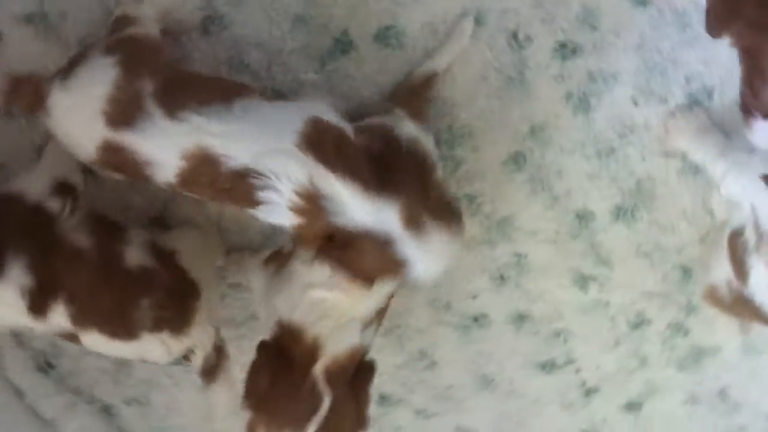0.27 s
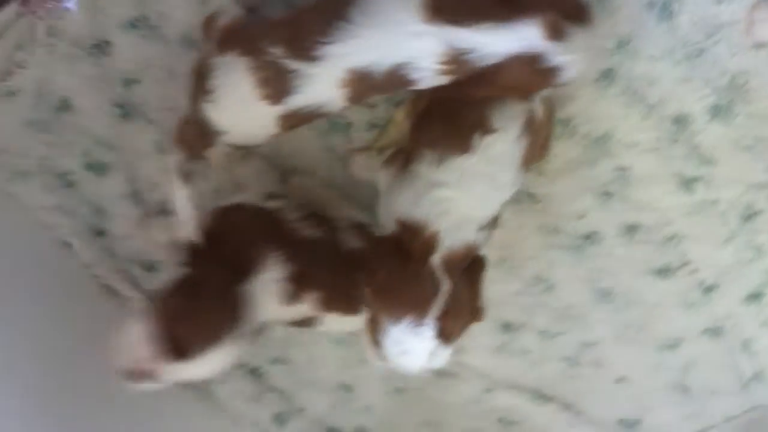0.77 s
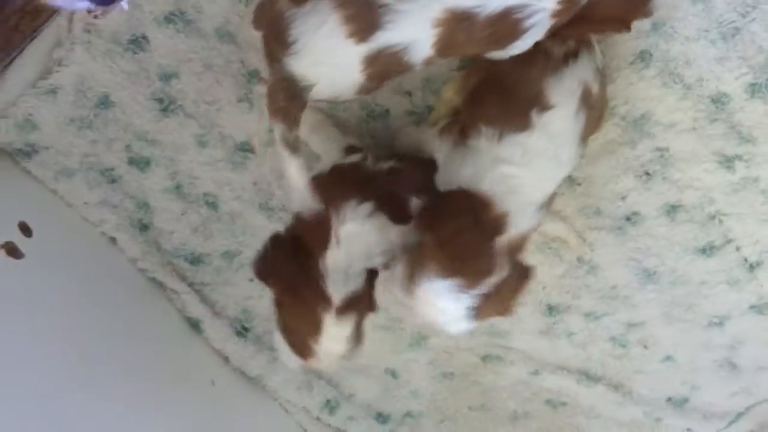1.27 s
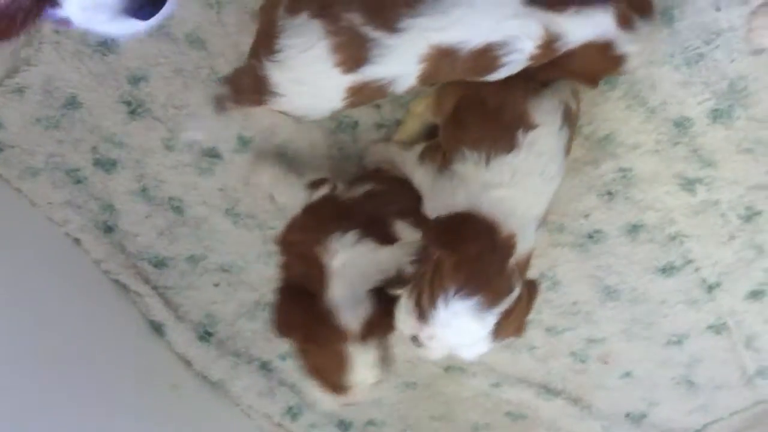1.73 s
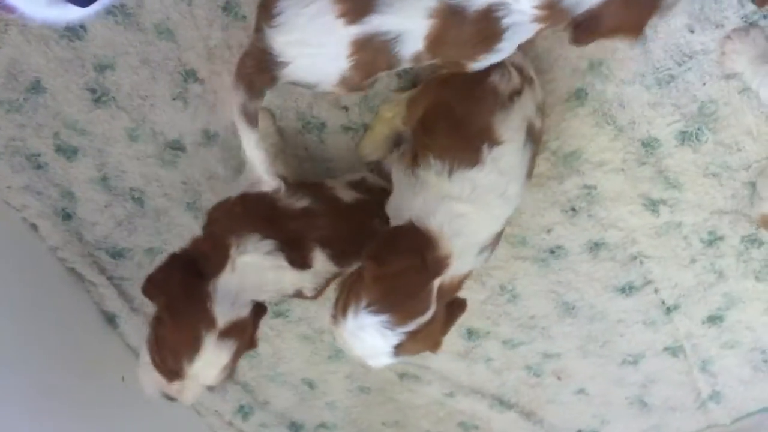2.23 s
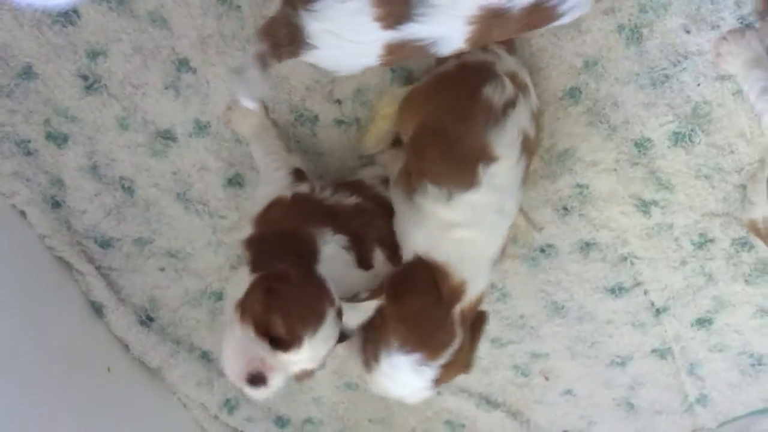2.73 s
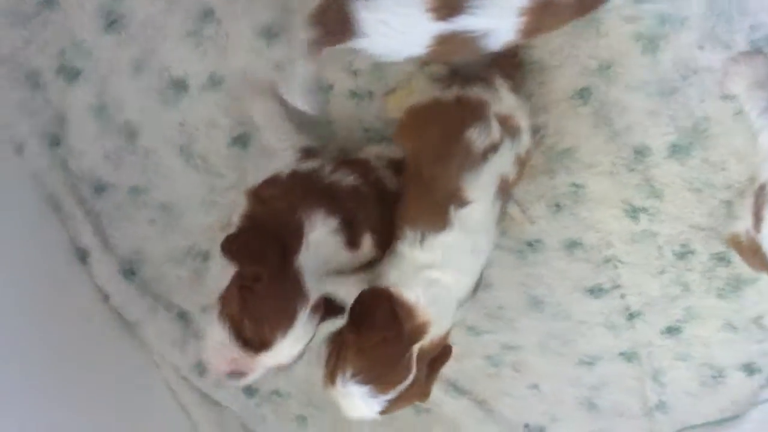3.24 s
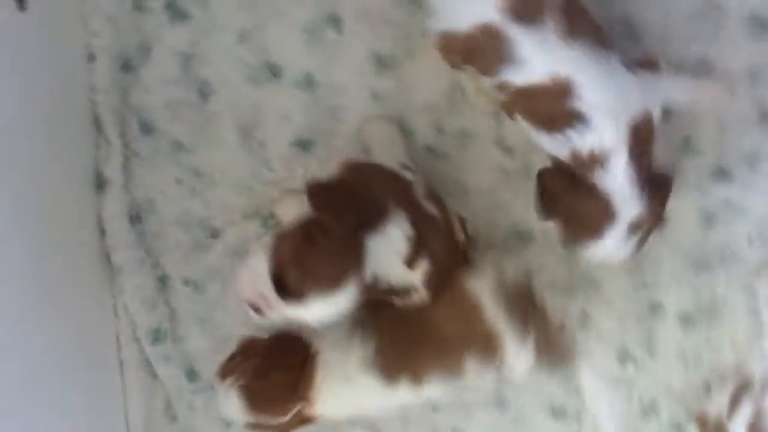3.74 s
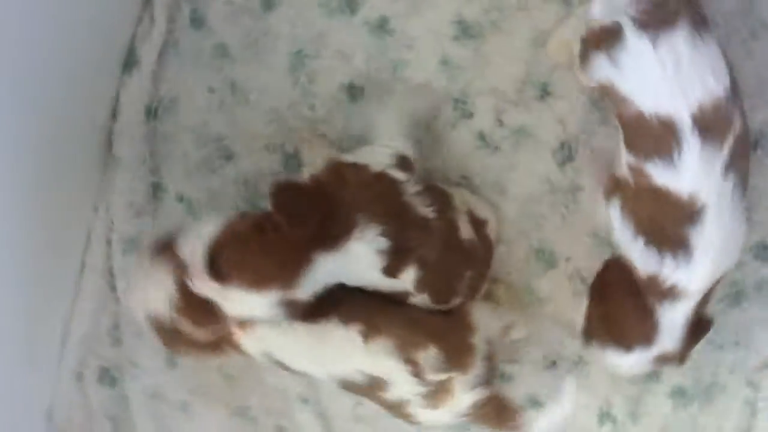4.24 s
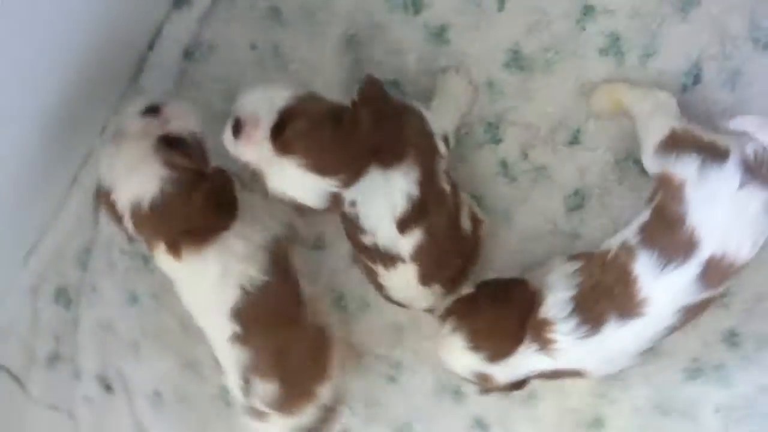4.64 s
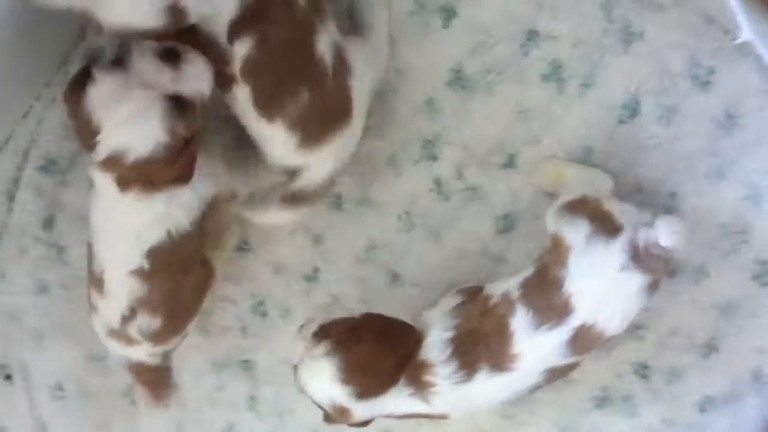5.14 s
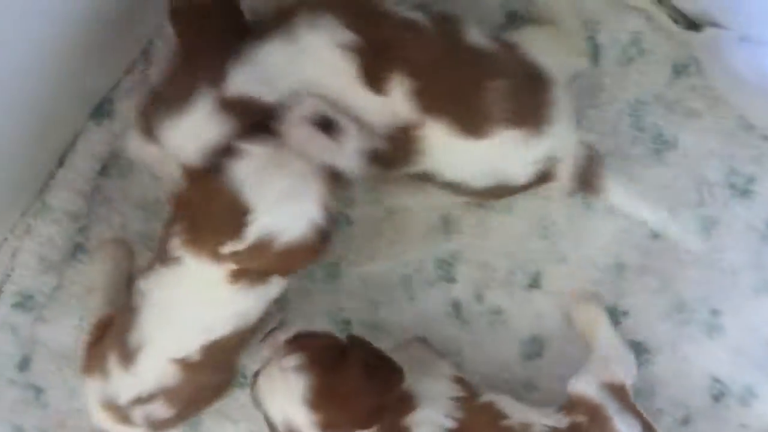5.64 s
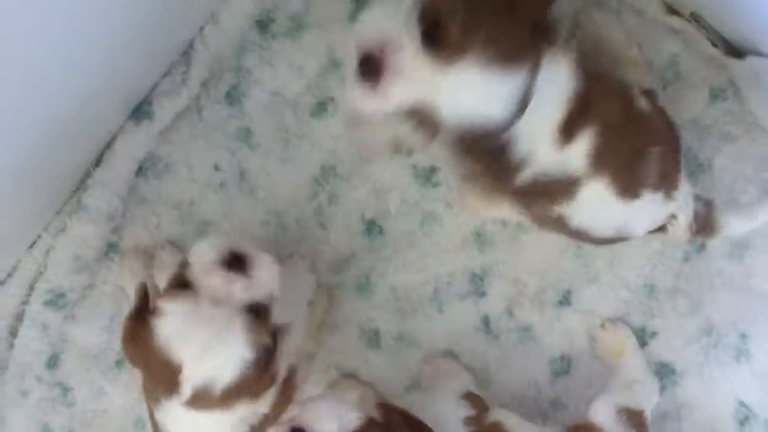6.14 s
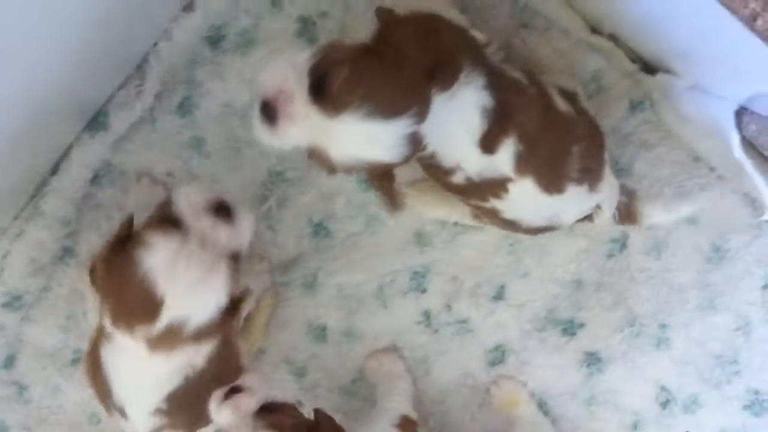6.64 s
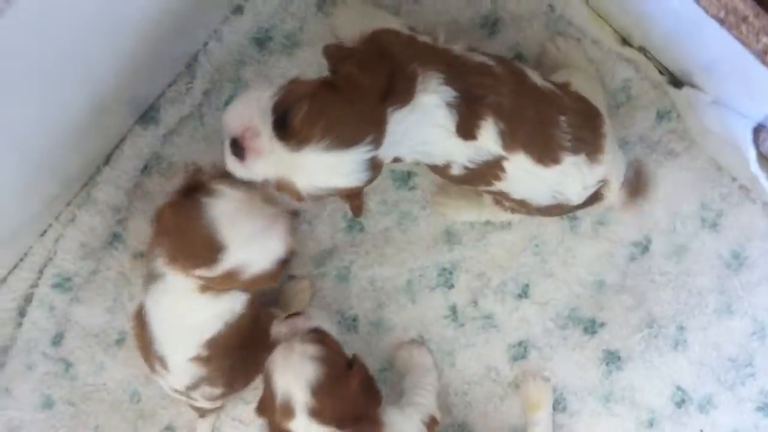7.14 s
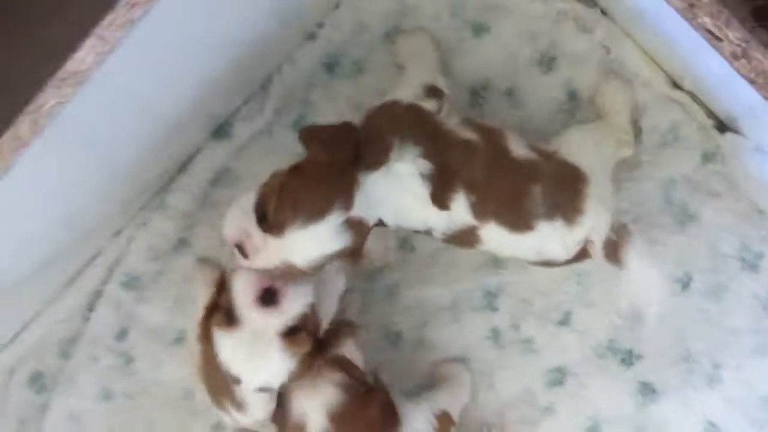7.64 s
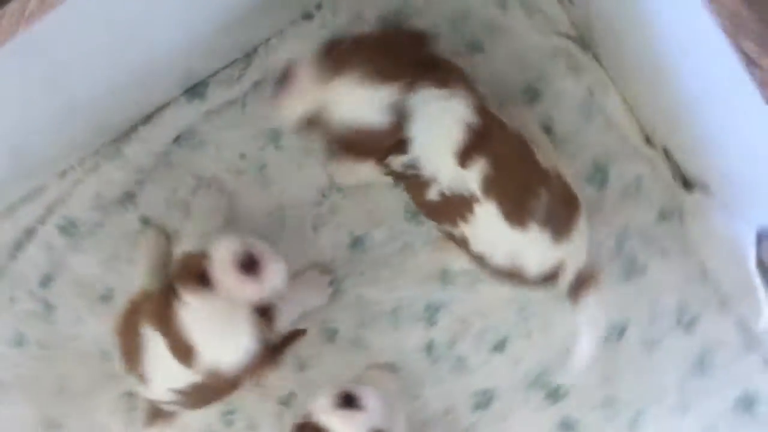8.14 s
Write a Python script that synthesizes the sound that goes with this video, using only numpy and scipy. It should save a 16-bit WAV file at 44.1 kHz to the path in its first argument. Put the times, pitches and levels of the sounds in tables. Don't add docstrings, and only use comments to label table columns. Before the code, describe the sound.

Indoors, a litter of young puppies is heard close to a handheld microphone, with a short bright room tail, faint hush and dull handling bumps. From 0.2 to 1.2 s one puppy gives thin, clean squeals, climbing in pitch to a long high arch around 1 s. A claw snaps at 1.2 s and a brief nasal whine follows at 1.3. Between 1.5 and 4.3 s it is quieter: soft panting, dull paw rubbing, light claw ticks, tiny low grunts and airy nose whistles, thickest around 3 to 3.7. Short whines appear at 4.3, 4.6 and 5.1. At 5.3 s a claw knocks the wall sharply amid a shuffle. Low whimpers come at 5.6 and 6.1 to 6.5, with stronger gasping. Arched yelps ring at 6.7, loudest at 7.0, with a stepped whine at 7.3, more shuffling from 7.7, and a last high yelp at 8.2 among crisp claw snaps.

```python
import sys
import numpy as np
from scipy import signal
from scipy.io import wavfile
from scipy.ndimage import uniform_filter1d

SR = 44100
rng = np.random.default_rng(int(sys.argv[2]) if len(sys.argv) > 2 else 0)


def store_wav(level_fs):
    pcm = np.round(np.clip(np.atleast_2d(level_fs), -1, 1) * 32767)
    wavfile.write(sys.argv[1], SR, pcm.T.astype(np.int16))


def makeup_ratio(level_db):
    decades = np.asarray(level_db, float) / 20
    return 10 ** decades


N = 370440

# frequency in Hz, density in dB per Hz.
HUSH_SPECTRUM = [(47, -42), (80, -44), (145, -11.5), (241, -2.5), (558, -10.5), (637, -11.5), (1060, -9),
                 (1160, -42), (1970, -14), (15700, -18)]
HUSH_DB = -64.5
# start in seconds, level in dB, decay time t60 in seconds.
BUMPS = [
    (0.25, -62, 0.16),
    (.56, -66, 0.26),
    (0.84, -54.5, 0.46),
    (5.121, -62, 0.11),
    (6.95, -75, 0.1),
    (8.2, -66, 0.18),
    (6.11, -68, .1),
    (7.3, -70, .1),
    (3.45, -70, .1),
    (4.57, -59, 0.11),
]

# frequency in Hz, t60 in seconds.
ROOM_DECAY = [(200, .2), (1000, .22), (3000, .22), (8000, .2), (15000, .12)]
# frequency in Hz, gain in dB.
ROOM_COLOUR = [(400, -1.5), (1500, -0.5), (3500, 0.5), (8000, -1.5)]
# delay in seconds, level in dB.
SLAPS = [(.0132, -12), (.0218, -12), (.0335, -11), (.0471, -13)]

# start in seconds, rise in seconds, fall in seconds, level in dB.
SHUFFLES = [(.42, 0.081, 0.37, -62), (.84, 0.022, 0.66, -64.5), (1.0, 0.47, 0.18, -63),
            (1.6, 0.31, 0.11, -69), (2.2, 0.49, 0.076, -63.5), (2.8, 0.045, 0.27, -63),
            (2.97, 0.14, 0.099, -66), (3.23, 0.12, 0.071, -66), (3.4, 0.14, 0.47, -72.5),
            (3.85, 0.33, 1, -64), (4.8, 0.49, 0.036, -59), (5.31, 0.04, 0.066, -48),
            (5.38, 0.069, 0.76, -61), (5.75, 0.14, 0.12, -56), (6.0, 0.53, 0.38, -68),
            (7.66, 0.026, 0.11, -50.5), (7.75, 0.12, 0.26, -57), (8.08, 0.05, 0.45, -60)]
# frequency in Hz, density in dB per Hz.
PAD_SPECTRUM = [(35, -38), (60, -6), (124, 1), (183, 15), (333, 9), (481, 5), (600, 10.5), (780, 11),
                (1320, -120)]
# start in seconds, peak in dB, centre in Hz.
SNAPS = [(1.2143, -35.5, 2035), (1.5165, -50, 7360), (1.6402, -53, 5200), (1.642, -56, 11000),
         (1.702, -57, 6500), (1.762, -71, 1450), (1.82, -49, 977), (2.0238, -55, 5690),
         (2.0637, -52, 11000), (2.095, -49, 11000), (2.119, -55, 5000), (2.124, -55, 13920),
         (2.16, -54, 5000), (2.474, -51, 1810), (2.6795, -55, 2050), (4.4644, -49.5, 700),
         (4.564, -47.5, 500), (4.812, -48, 600), (4.874, -48, 2200), (4.9368, -52, 3560),
         (4.987, -46, 1510), (5.2036, -48, 7000), (5.2163, -43.5, 3700), (5.358, -44, 14000),
         (5.409, -44, 3460), (5.794, -48.5, 2480), (6.3116, -48.5, 7000), (6.574, -44, 2180),
         (6.595, -57, 2200), (7.463, -45, 1400), (7.488, -41, 1310), (7.775, -48, 1900),
         (6.5789, -53, 8000), (6.649, -56, 1385), (8.0247, -40.5, 8950), (8.027, -43, 5000),
         (8.041, -49, 9000), (8.1354, -53, 8350), (8.141, -44, 7000), (8.3195, -37.5, 7550),
         (8.33, -41, 7000)]
# start in seconds, peak in dB, ring of the claw in Hz.
TICKS = [
    (5.328, -23.5, 4230),
]
# frequency in Hz, level in dB, t60 in seconds.
WALL_MODES = [(290, -23.5, 0.2), (2890, -6, 0.008), (4250, -14, 0.05), (5000, -5, 0.008), (6100, -6, .006)]

# start in seconds, rise in
# seconds, fall in seconds, throat level in dB, hiss level in dB.
PANTS = [(0, 0.00063, 0.2, -49, -55.5), (0, 0.071, 0.043, -53, -64), (.26, 0.14, 0.48, -50.5, -57.5),
         (.76, 0.063, 0.41, -51.5, -71), (1.27, 0.07, 0.34, -49.5, -49.5), (1.33, 0.1, 0.16, -49.5, -53),
         (1.42, 0.084, 0.83, -58, -71), (1.82, 0.16, 0.4, -52.5, -71), (1.98, 0.17, 0.11, -59.5, -67),
         (2.419, 0.072, .2, -58, -74), (2.46, 0.14, 0.26, -53, -72), (2.9, 0.21, 0.19, -46, -50.5),
         (3.27, 0.063, 0.11, -62, -63.5), (3.38, 0.061, 0.36, -46, -66), (3.432, 0.018, 0.35, -52, -52.5),
         (3.44, 0.097, 0.38, -49.5, -56), (3.54, 0.073, 0.15, -62, -62), (4.0, 0.075, 0.38, -56, -66.5),
         (4.2, 0.1, 0.28, -54, -61.5), (4.53, 0.053, 0.47, -53, -65), (4.76, 0.14, 0.55, -56.5, -68),
         (5.069, 0.048, 0.44, -48.5, -58.5), (5.3, 0.049, 0.38, -58, -60), (5.451, 0.12, 0.23, -48, -64.5),
         (5.752, 0.087, 0.089, -62.5, -50.5), (5.858, 0.052, 0.35, -46, -63.5),
         (6.06, 0.055, 0.029, -42.5, -59), (6.13, 0.041, 0.16, -59, -53), (6.268, 0.11, 0.25, -41.5, -58),
         (6.53, 0.057, 0.046, -64, -65), (6.63, 0.059, 0.35, -44, -63), (6.945, 0.012, 0.064, -49, -62),
         (6.68, .008, 0.11, -54, -61), (7.03, 0.077, 0.25, -42, -54.5), (7.25, 0.2, 0.42, -45, -64),
         (7.52, 0.083, 0.45, -56, -58.5), (7.76, 0.14, 0.21, -41, -54), (7.98, 0.038, 0.19, -52, -58),
         (8.07, 0.063, 0.043, -64, -50), (8.162, 0.04, 0.15, -44, -65), (8.2, 0.13, 0.14, -41.5, -55.5)]
# frequency in Hz, width in Hz, level in dB.
PANT_RINGS = [(1280, 510, 6.5), (1560, 630, 3), (2270, 1060, 2.5), (2520, 65, 2)]
# frequency in Hz, density in dB per Hz.
HISS_SPECTRUM = [(1940, -30), (3300, -10), (4480, -11), (5490, -4.5), (6500, -7), (8160, 1.5), (9610, -5),
                 (11600, -3), (15700, -16)]
# frequency in Hz, density in dB per Hz.
LEAK_SPECTRUM = [(1940, -25), (3300, -12), (4300, -18), (5490, -9), (8160, -5), (11600, -5), (13000, -11),
                 (14000, -13)]
REST_THROAT_DB, REST_HISS_DB, REST_PAWS_DB = -72, -93, -79.5
# start in
# seconds, length in seconds, first pitch in Hz, last pitch in Hz, level in dB.
WHISTLES = [(2.962, 0.066, 1400, 1400, -67), (3.042, 0.085, 2236, 2113, -45), (3.18, 0.09, 2420, 2390, -62),
            (3.15, 0.08, 1220, 1230, -57.5), (3.4, 0.098, 1290, 1300, -58),
            (3.69, 0.033, 1284, 1260, -57.5), (4.195, 0.06, 1448, 1317, -50),
            (4.055, 0.063, 1500, 1350, -59), (4.2, 0.033, 2000, 2050, -61),
            (4.37, 0.066, 1063, 1050, -62.5), (4.675, 0.11, 1400, 1310, -60), (5.155, 0.15, 990, 870, -55),
            (5.35, 0.054, 290, 310, -54.5), (3.51, .025, 968, 670, -47), (3.555, .1, 960, 680, -53.5),
            (5.207, 0.057, 2050, 2070, -55.5), (.075, 0.032, 1970, 1730, -52),
            (3.436, 0.11, 2114, 2000, -47), (3.565, 0.043, 1825, 1750, -44.5),
            (3.608, 0.05, 1740, 1800, -51.5), (4.583, 0.046, 2267, 2247, -46),
            (7.582, 0.035, 1850, 1700, -43), (7.59, 0.04, 1060, 997, -46), (2.682, 0.021, 1000, 720, -59),
            (3.95, 0.026, 930, 720, -64), (4.033, 0.0174, 920, 707, -50), (7.299, 0.037, 1010, 996, -45),
            (7.305, 0.036, 1600, 1800, -41), (4.568, 0.012, 1470, 1440, -42), (6.78, 0.11, 1620, 1450, -57),
            (7.445, 0.07, 1330, 1200, -49.5), (7.89, 0.028, 2050, 1960, -42),
            (7.835, 0.023, 1900, 2040, -46)]

# start in seconds, length in seconds, first pitch in Hz,
# last pitch in Hz, level in dB.
GRUNTS = [(1.171, 0.034, 415, 512, -50), (2.867, 0.029, 172, 175, -49), (3.066, 0.043, 260.3, 267, -47.5),
          (3.293, 0.031, 208.5, 203.6, -48), (3.295, 0.028, 346.6, 342.4, -48),
          (3.497, 0.068, 386.4, 323.4, -48), (3.564, .086, 305, 271.5, -49),
          (3.728, 0.043, 247, 265, -47.5), (3.801, .031, 496, 312, -51), (4.047, 0.021, 399, 282, -56),
          (4.274, 0.0564, 259.4, 309, -47.5), (4.895, 0.022, 356, 252, -47),
          (5.333, 0.025, 284, 236.5, -41.5), (6.106, 0.014, 326, 298, -41.5),
          (7.581, 0.059, 273.2, 250, -46.5), (7.865, 0.071, 444, 426, -46)]
# start in seconds, length in seconds, first pitch in Hz,
# last pitch in Hz, level in dB.
WIDE_GRUNTS = [
    (2.863, 0.022, 171.3, 173, -48.5),
    (3.292, 0.025, 346, 342, -52),
    (4.894, 0.021, 343, 259, -51),
    (7.299, 0.024, 350, 340, -42),
    (7.575, 0.057, 284.7, 251.5, -47),
]
# start in seconds, length in seconds, first pitch in Hz,
# last pitch in Hz, level in dB.
YIPS = [
    (0.6812, 0.0106, 2074, 1940, -32),
    (1.881, 0.029, 863, 820, -45),
    (1.901, 0.033, 405, 314, -51.5),
    (4.874, 0.022, 1414, 1335, -43),
    (5.652, 0.055, 1300, 1312, -53),
    (6.694, 0.031, 2430, 2427, -38.5),
    (6.953, 0.03, 2220, 2270, -37),
    (7.831, 0.037, 741, 890, -41.5),
]
GRUNT_MOUTH_HZ, WIDE_MOUTH_HZ = 890, 2050
WIDE_THIN_DB = 9

# time in seconds, pitch in Hz, effort in dB,
# mouth opening as lift of the higher harmonics in dB.
SQUEALS = [
    [(.208, 1184, -39, -20), (.228, 1257, -42.5, -6), (.25, 1465, -50, 12), (.275, 1543, -52, 13.5),
     (.3, 1440, -50, 12), (.345, 1244, -37.5, -6), (.38, 1280, -66, 9)],
    [(.388, 729, -59, -3), (.42, 950, -44.5, -9), (.45, 1202, -46.5, -15), (.52, 1107, -53, -28)],
    [(.53, 1325, -56.5, 2.5), (.585, 1586, -39.5, 8), (.625, 1835, -43.5, 16.5), (.66, 1897, -39.5, 0),
     (.69, 1875, -48, 4), (.73, 1822, -52, -1), (.78, 1847, -58, -3)],
    [(.862, 1182, -45, -5), (.875, 1231, -33, -4.5), (.92, 1413, -39.5, 7.5), (.955, 1606, -35, 9.5),
     (.99, 1826, -38, 6.5), (1.04, 1885, -31.5, -5), (1.07, 1685, -38.5, 2.5), (1.105, 1457, -38, 3),
     (1.16, 1512, -50.5, -1)],
]
# time in seconds, pitch in Hz, effort in dB, mouth opening in dB.
WHINES = [
    [(4.315, 890, -49, -15), (4.33, 940, -45.5, -20), (4.345, 1048, -53, -25), (4.37, 1055, -51, -6)],
    [(4.57, 538, -55, -9), (4.585, 449, -49.5, -2.5), (4.61, 444.5, -52, -4), (4.63, 475, -72, -21)],
    [(6.115, 654, -50, 4), (6.155, 655, -47, 7), (6.178, 777, -46.5, -1), (6.2, 617, -49.5, 8.5),
     (6.218, 890, -47, -20)],
    [(5.108, 519, -51, -1), (5.118, 496, -43, -3), (5.138, 447, -38, -10), (5.153, 409, -49, -10)],
    [(5.562, 361, -49.5, -11), (5.58, 394, -47.5, -12), (5.597, 485, -43, -12), (5.61, 536, -46, -17)],
    [(6.372, 1188, -63, -8), (6.385, 980, -41, -14), (6.397, 851, -36.5, -7), (6.412, 845, -38.5, -7)],
    [(6.41, 412.6, -46.5, -9), (6.43, 433, -39, -15), (6.445, 523, -47, -7), (6.458, 648, -51.5, 6),
     (6.47, 630, -49.5, 2), (6.485, 582, -56, 1)],
    [(7.315, 648, -60, 12), (7.335, 761, -43, -2), (7.352, 823, -46.5, 7), (7.385, 781, -42, 0),
     (7.4, 1004, -37, -7), (7.415, 974, -51, 9)],
]
# time in seconds, pitch in Hz, effort in dB, mouth opening in dB.
YELPS = [
    [(6.685, 1050, -48, 11), (6.705, 949, -40.5, 0), (6.73, 1116, -35.5, -3), (6.75, 1280, -40.5, -5),
     (6.79, 1163, -48, -6)],
    [(6.955, 879, -51.5, 8), (6.98, 958, -34, -2), (7.005, 1162, -29, -1.5), (7.025, 1178, -28.5, -1),
     (7.045, 1088, -32, -3), (7.065, 935, -37.5, 0.5), (7.09, 858, -42, -1), (7.125, 1046, -41, -12)],
    [(8.183, 967, -52, 5), (8.205, 1009, -33.5, -1), (8.232, 1258, -30, 0), (8.25, 1289, -34, 0),
     (8.272, 1345, -40.5, 7), (8.288, 1220, -37, -3), (8.305, 920, -48, 1), (8.335, 854, -60.5, 24)],
]
# time in seconds, pitch in Hz, effort in dB, mouth opening in dB.
BRIGHT_WHINE = [(1.288, 644, -58.5, 3), (1.3, 623.6, -46.5, 0), (1.37, 579, -42, -8), (1.41, 582, -77, 2)]
# start in seconds, length in seconds, first pitch in Hz,
# last pitch in Hz, effort in dB.
WHIMPERS = [
    (3.111, 0.063, 1280, 1192, -50.5),
    (4.612, 0.011, 491, 560, -55),
]
# frequency in Hz, level in dB.
THROAT = [(150, -14), (250, -3), (563, -2), (1850, 2.5), (2360, 7), (2530, -3.5), (3700, -32), (4470, -40),
          (5220, -16), (6880, -22.5), (8320, -12.5), (9390, -32), (10800, -21.5), (13500, -50)]
# frequency in Hz, level in dB.
SQUEAL_MOUTH = [(1940, -32), (3300, -19), (4010, -25.5), (5500, -15), (6020, -24.5), (7360, -14),
                (9000, -20), (11100, -12), (12800, -26), (13600, -21)]
# frequency in Hz, level in dB.
NOSE = [(1850, 2), (2500, 1.5), (3100, -31), (4500, -33), (6000, -18), (8000, -22), (11000, -12),
        (13200, -16)]
# pitch in Hz,
# second over fundamental in dB.
SECOND_LEAD = [(300, 2), (450, 14), (600, 3.5), (850, -2.5), (960, 3.5), (1220, 13.5), (1350, 4.5),
               (1600, -16), (1900, -13.5)]
JITTER_S = 7e-6
WHEEZE_DB = -15.5


def evened(x):
    return x / np.sqrt(np.mean(x ** 2) + 1e-20)


def read(points, hz):
    f, value = np.transpose(points)
    return np.interp(np.log(hz + 1), np.log(f + 1), value)


def add(mix, s, sound):
    part = mix[round(s * SR):][:len(sound)]
    part += sound[:len(part)]


def wobble(size, span_s):
    width = max(round(span_s * SR), 2)
    return evened(uniform_filter1d(uniform_filter1d(rng.standard_normal(size), width), width))


def noise(shape_db, patchy_db):
    hz = np.fft.rfftfreq(512, 1 / SR)
    real, imag, patches = rng.standard_normal((N // 128 + 5, 257, 3)).T
    patches = uniform_filter1d(patches, size=2, axis=0)
    patches = evened(uniform_filter1d(patches, size=16, axis=1))
    z = (real + 1j * imag) * makeup_ratio(shape_db(hz)[:, None] + patchy_db * patches)
    return evened(signal.istft(z, nperseg=512, noverlap=384)[1][:N])


def burst_through(size, low_hz, high_hz):
    band = signal.butter(2, [low_hz, high_hz], "band", fs=SR)
    return signal.lfilter(*band, rng.standard_normal(size))


def swells(rows, rest_db):
    power = np.full(N, makeup_ratio(2 * rest_db))
    for s, rise, fall, db in rows:
        t = np.arange(0, rise + fall, 1 / SR)
        flow = np.minimum(t / rise, 1 - (t - rise) / fall)
        add(power, max(s, 0), makeup_ratio(2 * db) * flow ** 4)
    return np.sqrt(power)


def house_hush():
    return makeup_ratio(HUSH_DB) * noise(lambda hz: read(HUSH_SPECTRUM, hz), 2.8)


def bump(s, db, t60):
    t = np.arange(SR // 3) / SR
    low = burst_through(len(t), 60, 220)
    return s, makeup_ratio(db - 60 * t / t60) * evened(low) * np.minimum(t / 0.0099, 1)


def hand_rumble():
    low = signal.butter(2, 8, fs=SR, output="sos")
    hand = makeup_ratio(-80.0) * evened(signal.sosfilt(low, rng.standard_normal(N)))
    for row in BUMPS:
        add(hand, *bump(*row))
    return hand


def room(x):
    taps = np.zeros(SR // 2)
    at = np.arange(300, SR // 2 - 20, 20)
    taps[at + rng.integers(0, 20, len(at))] = rng.choice([-1., 1.], len(at))
    hz, t, z = signal.stft(taps, SR, nperseg=256)
    gain_db = read(ROOM_COLOUR, hz)[:, None] - 60 * t / read(ROOM_DECAY, hz)[:, None]
    tail = signal.istft(z * makeup_ratio(gain_db), SR, nperseg=256)[1]
    tail = tail / np.linalg.norm(tail)
    for s, db in SLAPS:
        add(tail, s, makeup_ratio(db) * np.array([1, -.6]))
    return signal.fftconvolve(x, tail)[:N]


def paws():
    return swells(SHUFFLES, REST_PAWS_DB) * noise(lambda hz: read(PAD_SPECTRUM, hz), 3.5)


def snap(s, db, hz):
    t = np.arange(600) / SR
    burst = burst_through(len(t), .6 * hz, min(1.5 * hz, 20000))
    return s, makeup_ratio(db - 60 * t / 0.015) * evened(burst)


def tick(s, db, hz):
    t = np.arange(4000) / SR
    crack = burst_through(len(t), 2600, 6000) * makeup_ratio(-60 * t / 0.024)
    ring = np.sin(2 * np.pi * hz * t) * makeup_ratio(-60 * t / .005)
    wall = np.zeros(len(t))
    for mode_hz, mode_db, t60 in WALL_MODES:
        struck_hz = mode_hz * rng.uniform(0.93, 0.98)
        wall += makeup_ratio(mode_db - 60 * t / t60) * np.sin(2 * np.pi * struck_hz * t)
    return s, makeup_ratio(db) * (0.75 * crack + .3 * ring + 0.58 * wall)


def throat_shape(hz):
    rings = sum(makeup_ratio(2 * db) / (1 + (2 * (hz - f) / width) ** 2) ** 1.41 for f, width, db in PANT_RINGS)
    edges = 1 / (1 + (hz / 3000) ** 12) / (1 + (620 / (hz + 1)) ** 5)
    return 10 * np.log10(rings * edges)


def breath(wheeze):
    puffs = PANTS
    throat_gain = swells([row[:-1] for row in puffs], REST_THROAT_DB)
    hiss_gain = swells([row[:-2] + row[-1:] for row in puffs], REST_HISS_DB)
    throat = noise(throat_shape, 3.2)
    hiss = noise(lambda hz: read(HISS_SPECTRUM, hz), 3.9)
    leak = noise(lambda hz: read(LEAK_SPECTRUM, hz), 1.5)
    flutter = makeup_ratio(1.1 * wobble(N, .015))
    return flutter * (throat_gain * throat + hiss_gain * hiss + wheeze * leak)


def whistle(s, length, first_hz, last_hz, db):
    t = np.arange(0, length, 1 / SR)
    hz = np.linspace(first_hz, last_hz, len(t)) * (1 + .02 * wobble(len(t), .004))
    swell = np.sin(np.pi * t / length) ** .6 * makeup_ratio(db + 3 * wobble(len(t), .008))
    return s, swell * np.sqrt(2) * np.sin(2 * np.pi * np.cumsum(hz) / SR)


def harmonics(hz, level_db, smear):
    top_hz = .3 * SR
    k = np.arange(1, min(40, int(top_hz / hz.min())) + 1)[:, None]
    cycles = np.cumsum(hz) / SR + smear * wobble(len(hz), .0012)
    turns = k * cycles + rng.random(k.shape)
    flicker_db = np.array([wobble(len(hz), .012) for _ in k]) * np.minimum(.7 * k, 4.5)
    level = makeup_ratio(level_db(k) + flicker_db) * (k * hz < top_hz)
    return (level * np.cos(2 * np.pi * turns)).sum(0) * np.sqrt(2)


def grunt(s, length, first_hz, last_hz, db, mouth_hz, thin_db=3):
    t = np.arange(0, length, 1 / SR)
    hz = np.linspace(first_hz, last_hz, len(t)) * (1 + .013 * wobble(len(t), .006))

    def level_db(k):
        f = k * hz
        mouth_db = 12 / (1 + ((f - mouth_hz) / 260) ** 2)
        tilt_db = -1.3 * np.log2(f / 300) + thin_db * np.minimum(np.log2(f / 900), 0)
        return 0.73 * read(THROAT, f) + mouth_db + tilt_db

    tone = evened(harmonics(hz, level_db, .011))
    ends = np.clip(np.minimum(t / 0.0013, (length - t) / 0.0047), 0, 1)
    return s, makeup_ratio(db) * tone * ends * np.sin(np.pi * (0.3 + .5 * t / length))


def whimper(s, length, first_hz, last_hz, db):
    mouth_db = -2
    return [(s, first_hz, db + 1, mouth_db),
            (s + length / 2, (first_hz + last_hz) / 2, db, mouth_db),
            (s + length, last_hz, db + 2, mouth_db)]


def cry(rows, nasal=False):
    s, *columns = np.transpose(rows)
    t = np.arange(s[0], s[-1], 1 / SR)
    curves = [uniform_filter1d(np.interp(t, s, c), size=350, mode="nearest") for c in columns]
    hz, effort_db, mouth_db = curves
    lead_db = read(SECOND_LEAD, hz)
    first_db = effort_db - np.maximum(lead_db, 0)
    second_db = effort_db + np.minimum(lead_db, 0)
    hz = hz * (1 + .004 * wobble(len(t), .006) + .008 * wobble(len(t), .015))
    tremble_db = 1.1 * wobble(len(t), .006) + 1.1 * wobble(len(t), .0015)
    colour = NOSE if nasal else SQUEAL_MOUTH if hz.max() > 1420 else THROAT

    def level_db(k):
        upper_db = effort_db + mouth_db + read(colour, k * hz)
        return np.where(k == 1, first_db, np.where(k == 2, second_db, upper_db)) + tremble_db

    tone = harmonics(hz, level_db, JITTER_S * hz)
    ends = np.clip(np.minimum((t - s[0]) / 0.00075, (s[-1] - t) / 0.0052), 0, 1)
    return s[0], tone * ends, makeup_ratio(effort_db + mouth_db + WHEEZE_DB) * ends


def scene():
    near, wheeze = np.zeros((2, N))
    cries = [cry(rows) for rows in SQUEALS + WHINES + YELPS]
    cries += [cry(BRIGHT_WHINE, nasal=True)]
    cries += [cry(whimper(*row)) for row in WHIMPERS]
    for s, tone, leak in cries:
        add(near, s, tone)
        add(wheeze, s, leak)
    for row in GRUNTS:
        add(near, *grunt(*row, GRUNT_MOUTH_HZ))
    for s, length, first_hz, last_hz, db in YIPS:
        add(near, *grunt(s, length, first_hz, last_hz, db, (first_hz + last_hz) / 2))
    for row in WIDE_GRUNTS:
        add(near, *grunt(*row, WIDE_MOUTH_HZ, WIDE_THIN_DB))
    for row in WHISTLES:
        add(near, *whistle(*row))
    for row in SNAPS:
        add(near, *snap(*row))
    for row in TICKS:
        add(near, *tick(*row))
    echoes = makeup_ratio(-10) * room(near)
    return (near + echoes + breath(wheeze) + paws() + house_hush())[None]


def top_cut(x):
    return signal.sosfilt(signal.butter(12, 15810, fs=SR, output="sos"), x)


def record(dry):
    thin = signal.sosfilt(signal.butter(4, 105, "high", fs=SR, output="sos"), dry)
    return top_cut(thin + hand_rumble())


dry = scene()
out = record(dry)
store_wav(out)
```